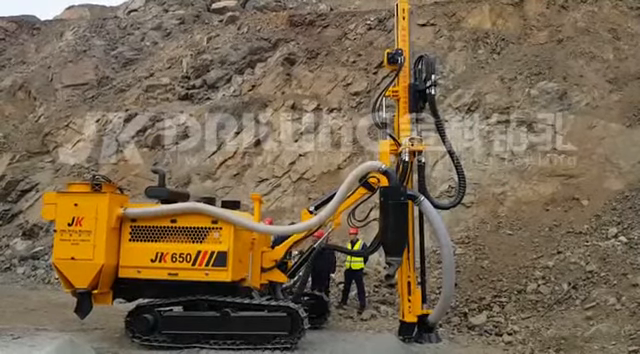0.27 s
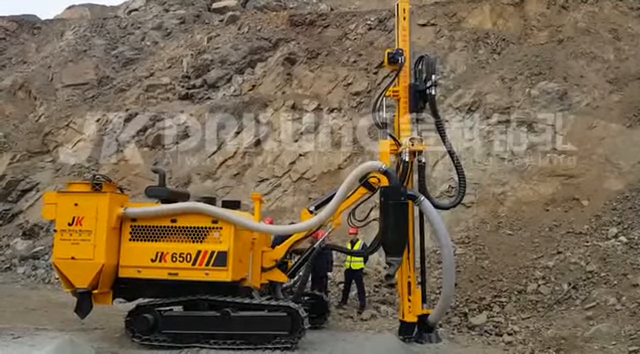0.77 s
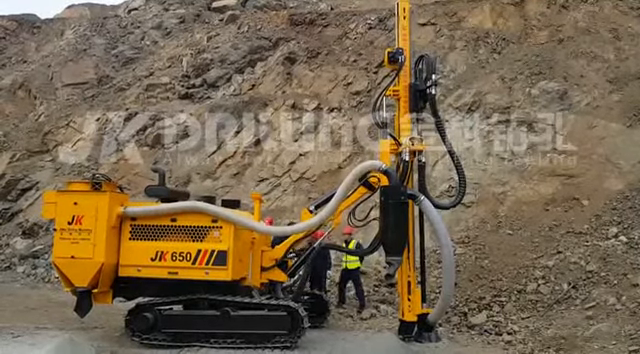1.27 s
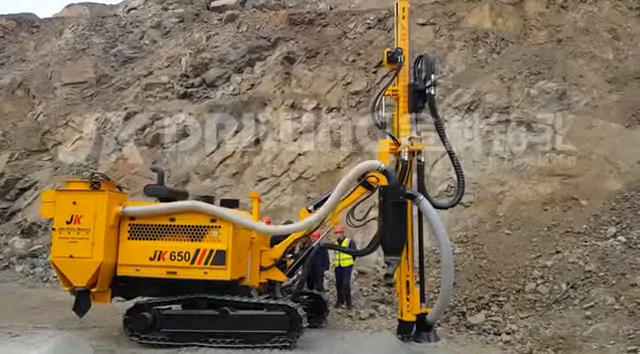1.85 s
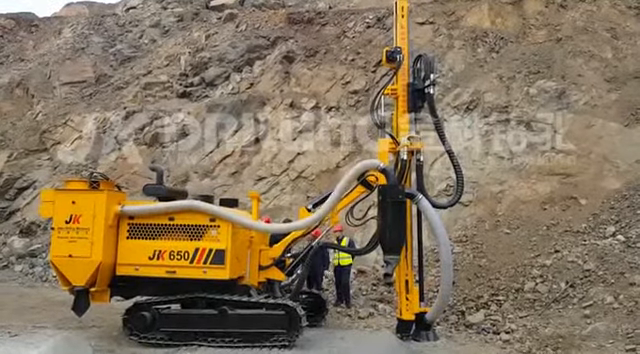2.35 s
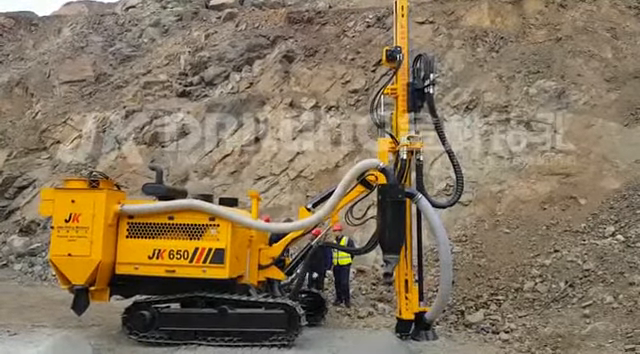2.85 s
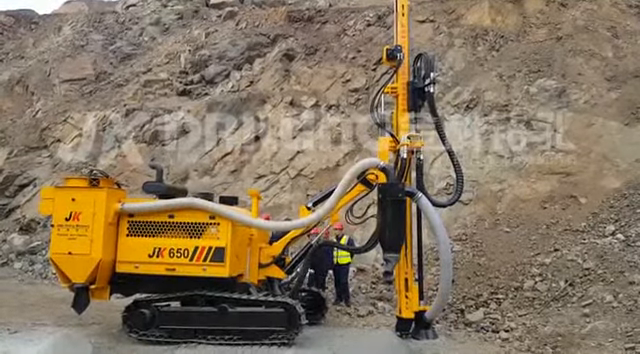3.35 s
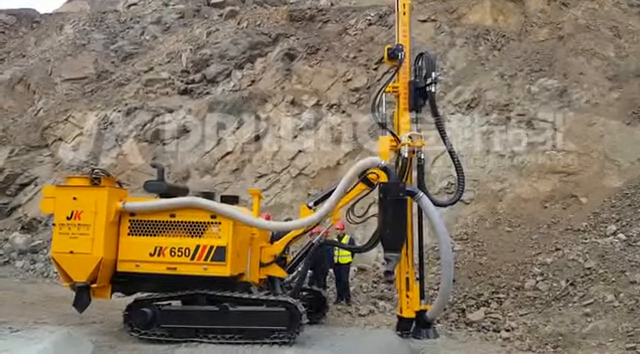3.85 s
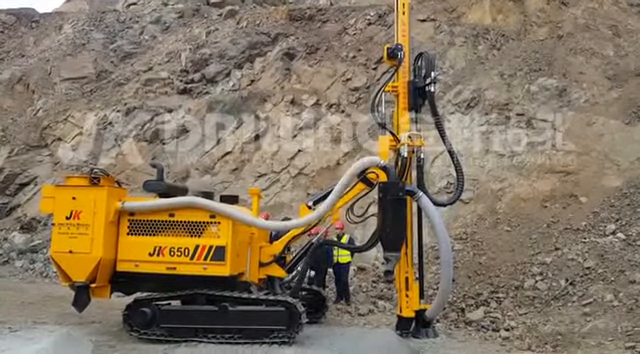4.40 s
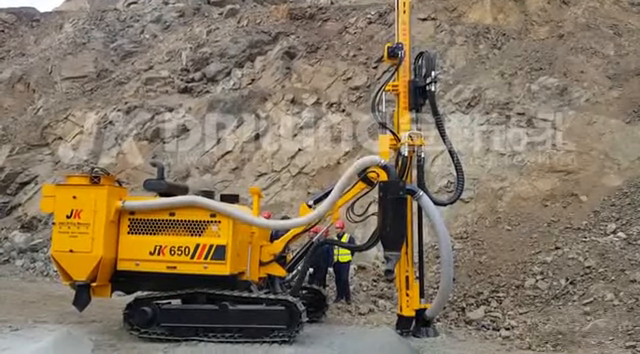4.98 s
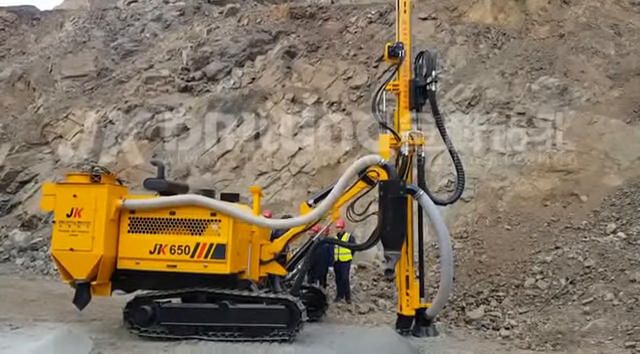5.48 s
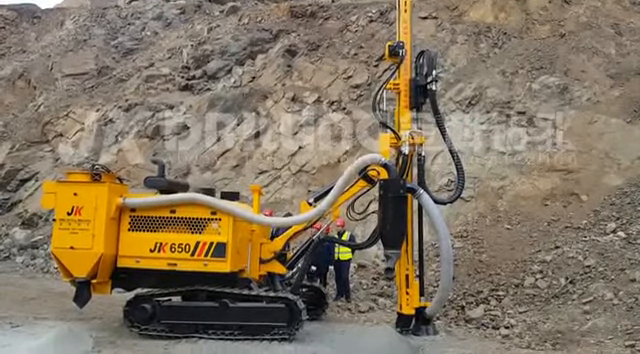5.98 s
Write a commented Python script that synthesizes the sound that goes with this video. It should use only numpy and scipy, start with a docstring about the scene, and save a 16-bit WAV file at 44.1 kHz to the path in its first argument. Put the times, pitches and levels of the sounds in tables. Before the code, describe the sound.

Piercing compressor whine and dense machine roar surround a fast steel hammer rattle, with brief metal squeals and a groan near the end.

```python
"""A crawler drill rig at a quarry face, heard some metres away through a two-port microphone.
From the start fans roar, pumps hum, the diesel drones on its engine orders and screw lobes whine in harmonics.
The air hammer clanks at 21 to 23 blows a second, exciting the modes of the steel rod; air hisses in puffs.
Noise jets spurt at 0.45 s and 1.3 s; the whine sags by 1.85 s and creeps back up until 5.8 s.
The level dips briefly at 4.4 s and 6.2 s; gliding sines squeal from 5.1 s and groan at 5.75 s; the hammer races last."""
import sys
import numpy as np
from scipy import signal
from scipy.fft import rfft, irfft
from scipy.io import wavfile

SR = 44100
rng = np.random.default_rng(int(sys.argv[2]) if len(sys.argv) > 2 else 0)


def generate_wav(sig):
    """Save sig (samples, or channels by samples) to the path in sys.argv[1] as 16-bit PCM at SR."""
    pcm = np.round(np.clip(np.atleast_2d(sig).T, -1, 1) * 32767).astype(np.int16)
    wavfile.write(sys.argv[1], SR, pcm)


N = 275184
TIME = np.arange(N) / SR
FREQS = np.maximum(np.arange(N // 2 + 1) * SR / N, 1)


def from_db(db):
    """Decibels to gain."""
    return 10 ** (np.asarray(db) / 20)


def rms_one(x):
    """Scale to rms 1."""
    return x / np.sqrt(np.mean(x ** 2) + 1e-20)


def in_time(rows):
    """The columns of a curve table at every sample."""
    s, *columns = np.transpose(rows)
    return [np.interp(TIME, s, column) for column in columns]


def in_frequency(rows):
    """The columns of a spectrum table at every frequency, joined along a logarithmic axis."""
    hz, *columns = np.transpose(rows)
    return [np.interp(np.log(FREQS), np.log(hz), column) for column in columns]


def drift(rate, slowest=0.92):
    """Random wander of spread 1, between about `slowest` and `rate` changes a second."""
    shape = FREQS ** 2 / (FREQS ** 2 + slowest ** 2) / (1 + (FREQS / rate) ** 2)
    return rms_one(irfft(rfft(rng.standard_normal(N)) * shape, N))


def turns(hz):
    """Cycles done so far at a changing rate."""
    return np.cumsum(hz * np.ones(N)) / SR


def tone(cycles):
    """A sine of rms 1 with a chance starting phase."""
    return np.sqrt(2) * np.sin(2 * np.pi * (cycles + rng.random()))


def resonance(x, hz, width):
    """Two-pole resonance with gain 1 on top."""
    r = np.exp(-np.pi * width / SR)
    feed = np.array([1, 0, -1]) * (1 - r * r) / 2
    feedback = [1, -2 * r * np.cos(2 * np.pi * hz / SR), r * r]
    return signal.lfilter(feed, feedback, x)


def dying(kicks, fall_s):
    """Every kick starts an exponential fall."""
    return signal.lfilter([1], [1, -np.exp(-1 / (fall_s * SR))], kicks + 1e-18)


def gate(start, length, edge_s):
    """Attack, hold and release of one event."""
    return np.clip(np.minimum(TIME - start, start + length - TIME) / edge_s, 0, 1)


def sides(amount):
    """Half of an amount to the left, minus half to the right."""
    return np.array([[.5], [-.5]]) * amount


# the sound field at the two microphone ports:
# (frequency [Hz], coherence [-1 to 1], lead of the left [rad], left-right [dB])
PORTS = [(30, .86, 0, 0), (55, .8, 0, 0), (85, .55, 0, 0), (120, .88, 0, 0), (165, .85, 0, 0),
         (200, .985, 0, 0), (280, .995, 0, -.1), (410, .975, 0, -.2), (470, .87, -.1, -.3),
         (720, .9, 0, -.6), (1180, .86, 0, -1.1), (1550, .1, 1.2, -2.7), (1800, .2, 1.2, .2),
         (2000, .68, 0, .9), (2200, .35, 2.6, .6), (2650, .5, 1.9, .6), (3000, .8, 2.9, 1),
         (3600, .4, 2.5, 2.8), (4700, .12, 0, 3.5), (5600, .05, 0, .5), (6300, .5, 0, .1),
         (7400, .3, 0, 1.5)]


def at_ports(pair):
    """Two unrelated signals become a sound field: alike in the bass, opposed near 3 kHz."""
    alike, lead, pan_db = in_frequency(PORTS)
    alike = np.clip(alike, -1, 1)
    mid, side = rfft(pair) * np.sqrt(np.array([1 + alike, 1 - alike]) / 2)
    ports = np.array([mid + side, mid - side])
    return irfft(ports * from_db(sides(pan_db)) * np.exp(1j * sides(lead)), N)


# the hammer's pace: (time [s], rate [blows/s])
HAMMER = [(0, 21.42), (0.9, 21.53), (1.6, 22.05), (2.2, 21.42), (5.8, 21.44), (6.24, 23.3)]
FIRST_STROKE = .12  # share of a stroke that passes before the first blow
STROKE_JITTER_S = 0.00119  # spread of the blows about their beat


def strokes(uneven_db):
    """One click for every stroke of the piston, scattered in timing and, by `uneven_db`, in strength."""
    pace, = in_time(HAMMER)
    at = np.flatnonzero(np.diff(np.floor(turns(pace) - FIRST_STROKE)))
    strength, late = np.clip(rng.standard_normal((len(at), 2)), -2, 2).T
    at = np.clip(at + (late * STROKE_JITTER_S * SR).astype(int), 0, N - 1)
    kicks = np.zeros(N)
    kicks[at] = from_db(uneven_db * strength)
    return kicks


# flicker of narrow noise bands: (frequency [Hz], spread before the rises are capped [dB])
BAND_FLICKER = [(900, 0), (1150, 3), (2100, 3), (2400, 6.5), (3400, 6.5), (3700, 2.2), (5000, 2.2),
                (7400, 3.2)]
FLICKER_PER_S = 13  # how fast they flicker


def band_flicker(noise):
    """Random flicker in level, drawn separately for each narrow noise band."""
    depth_db, = in_frequency(BAND_FLICKER)
    spectrum = rfft(noise)
    band = np.digitize(FREQS, np.geomspace(1100, 7800, 26))
    out = np.zeros((2, N))
    for k in range(band.max() + 1):
        flicker = np.minimum(drift(FLICKER_PER_S, slowest=4.4), 1)  # sinks further than it rises
        out += irfft(spectrum * (band == k), N) * from_db(depth_db[band == k].mean() * flicker)
    return rms_one(out)


# colour of the fan and air noise: (frequency [Hz], relative density [dB per Hz])
ROAR = [(25, -22.5), (55, -19), (120, -32.5), (300, -3.5), (380, -2), (480, -4.5), (570, -6), (1040, -2.5),
        (1170, -3.5), (1240, -9), (1340, -5), (1480, -8), (1750, -8.5), (2130, -5.5), (2320, -10.5),
        (2850, -18.5), (3170, -16), (3310, -20.5), (3420, -33.5), (3500, -19.5), (4150, -21.5), (4420, -27),
        (4800, -23.5), (5600, -27.5), (6300, -23.5), (7400, -30.5)]
# slow swell, in full on most of the whine and in part on the roar: (time [s], offset [dB])
LOUDNESS = [(0, -2), (0.7, -2.5), (1.3, -0.8), (1.85, -3.5), (2.4, -1.5), (3.3, -2.2), (3.85, -3.5),
            (5.1, -1.5), (5.35, -2), (5.88, 0.5), (6.24, -2.5)]
ROAR_FOLLOWS = 0.57  # share of that swell, in dB, taken by the roar and hiss
PUFF_SHARE = .05  # rms of the puffs against the steady hiss gain


def air(roar_db=-18.0, hiss_db=-18.5, churn_db=1.48):
    """Fans roar as coloured noise; above them the flushing air hisses, with puffs at the hammer's pace."""
    loud_db, = in_time(LOUDNESS)
    colour_db, = in_frequency(ROAR)
    noise = band_flicker(irfft(rfft(rng.standard_normal((2, N))) * from_db(colour_db), N))
    roar = irfft(rfft(noise) / (1 + (FREQS / 3370) ** 16), N)  # below about 3.4 kHz
    puffs = rms_one(dying(strokes(uneven_db=2.5), .01))
    flicker_db = .45 * drift(14, slowest=3)
    hiss = (noise - roar) * (1 + PUFF_SHARE * puffs) * from_db(hiss_db + flicker_db)
    churn = drift(15, slowest=5)
    return (roar * from_db(roar_db + churn_db * churn) + hiss) * from_db(ROAR_FOLLOWS * loud_db)


# spurts of flushing air: (start [s], length [s], held level [dB rms])
SPURTS = [(0.45, 0.054, -35), (1.305, 0.095, -32), (1.385, .21, -38)]
SPURT_EDGE_S = .03  # attack and release
SPURT_HZ, SPURT_WIDTH_HZ = 6050, 1500  # centre and width of the hiss


def spurts():
    """Air escapes in short, bright jets of resonant noise."""
    jet = rms_one(resonance(rng.standard_normal((2, N)), SPURT_HZ, SPURT_WIDTH_HZ))
    return jet * sum(from_db(db) * gate(s, length, SPURT_EDGE_S) for s, length, db in SPURTS)


# steady tones of the pumps and fans: (frequency [Hz], level before wavering [dB rms])
PUMPS = [(92.0, -33), (160, -38.5), (218.4, -29.5), (655.3, -40)]


def pumps(hunting=0.0029, waver_db=3.0):
    """Each pump and fan hums at its own nearly steady rate."""
    hum = np.zeros(N)
    for hz, db in PUMPS:
        cycles = turns(hz * (1 + hunting * drift(7.9)))
        hum += tone(cycles) * from_db(db + waver_db * drift(2.7))
    return hum


# engine orders; six cylinders fire at multiple 6:
# (multiple of the four-stroke cycle rate, level before unevenness and muffler [dB rms])
DIESEL = [(6, -37), (10, -39.5), (11, -38), (12, -38), (13, -40), (15, -43.5), (17, -42), (18, -40),
          (20, -39.5), (21, -41.5), (22, -43), (24, -43)]
CYCLE_HZ = 13.86
MUFFLER_HZ = 59  # the drone falls away below this


def diesel(hunting=0.00416, uneven_db=8.5):
    """Unequal cylinders fill in the orders around the firing rate."""
    cycles = turns(CYCLE_HZ * (1 + hunting * drift(0.84)))
    drone = np.zeros(N)
    for order, db in DIESEL:
        uneven = np.minimum(drift(59, slowest=1.8), np.sqrt(2))
        drone += tone(order * cycles) * from_db(db + uneven_db * uneven)
    muffler = signal.butter(4, MUFFLER_HZ, "high", fs=SR, output="sos")
    return signal.sosfilt(muffler, drone)


# harmonics of the whine: (harmonic number, level before swells and flutter [dB rms])
WHINE = [(1, -19.5), (2, -17.5), (3, -28), (4, -17), (5, -51.5), (6, -29), (7, -55.5), (8, -41.5)]
# how each harmonic, in the same order, reaches the ports: (left-right [dB], lead of the left [rad])
PATHS = [(-0.4, 0.15), (-2.2, 0.4), (-9, 1.9), (0, 2.36), (1.9, -2.1), (-1.7, -2.2), (3.4, -2.5),
         (13, -1.8)]
# compressor speed, sagging and creeping back: (time [s], lobe rate [Hz])
SPEED = [(0, 536.6), (1.4, 537.5), (1.85, 535.6), (3.3, 537.1), (5.8, 539.0), (6.24, 538.5)]
# the fourth harmonic swells a little, and fades at the left port:
# (time [s], offset [dB], extra gain of the left [dB])
FOURTH = [(0, 1, -1.3), (0.7, 1.2, -2.2), (1, -0.5, -2.6), (1.7, -0.5, -2.4), (2.2, 1.3, -2.2),
          (3.0, 1.2, -2.6), (3.6, 0.3, -3.0), (4.4, 1, -5.5), (5.3, 1.2, -8.1), (5.8, 1.8, -7),
          (6.24, -0.5, -5.9)]
# the sixth harmonic comes and goes: (time [s], offset on top of LOUDNESS [dB])
SIXTH = [(0, -1), (0.63, -3), (0.74, -9.5), (1.35, -9), (1.52, -4), (1.8, -4.5), (1.92, -8), (2.25, -4),
         (2.45, -3), (2.8, -2.5), (3.25, -4.5), (3.8, -0.5), (4.84, -0.5), (4.95, -5.5), (5.98, -6),
         (6.1, 0), (6.24, -2)]
# the eighth harmonic comes and goes: (time [s], offset on top of LOUDNESS [dB])
EIGHTH = [(0, 1), (1.3, -3.5), (1.75, 1.5), (1.95, -4), (2.2, -3), (2.8, 1), (3.1, 0), (3.3, -2.5),
          (4.0, 0), (4.9, -1), (5.05, -1.5), (5.35, -4), (5.5, -5.5), (5.65, -3), (5.85, -6), (6.05, -1),
          (6.24, -7)]
SCATTER = .045  # share of the first harmonic that arrives by stirred air


def compressor(wobble_hz=0.23, flutter_db=1.34, flutter_per_s=14):
    """Screw lobes chop the air into a harmonic whine; stirred air scatters the high harmonics most."""
    (hz,), (loud_db,) = in_time(SPEED), in_time(LOUDNESS)
    fourth_db, fourth_left_db = in_time(FOURTH)
    swell_db = {4: fourth_db, 6: loud_db + in_time(SIXTH)[0], 8: loud_db + in_time(EIGHTH)[0]}
    cycles = turns(hz + wobble_hz * drift(5.5))
    out = np.zeros((2, N))
    for (k, db), (pan_db, lead) in zip(WHINE, PATHS):
        stir = np.array([drift(flutter_per_s, slowest=3) for _ in range(5)])
        scattered = stir[:2] + 1j * stir[2:4]
        path = np.exp(1j * sides(lead)) + SCATTER * np.cbrt(k) * scattered
        carrier = np.exp(2j * np.pi * (k * cycles + rng.random()))
        wave = np.sqrt(2) * np.real(path * carrier)
        if k == 4:
            wave[0] *= from_db(fourth_left_db)
        flutter = flutter_db * np.cbrt(k) * stir[-1]
        out += wave * from_db(db + flutter + sides(pan_db) + swell_db.get(k, loud_db))
    return out


# the rod squeals, then groans, in its guide:
# (start [s], length [s], first pitch [Hz], last pitch [Hz], held level [dB rms])
SQUEALS = [(5.095, 0.072, 656, 640, -24.5), (5.16, 0.13, 668, 642, -26), (5.278, 0.056, 644, 596, -26),
           (5.748, .135, 372, 364, -26)]
SQUEAL_EDGE_S = 0.012  # attack and release of a slip


def squeal(waver=0.003):
    """Steel rubbing in the guide sings in short slips, each falling in pitch."""
    out = np.zeros(N)
    wobble = 1 + waver * drift(60, slowest=10)
    for s, length, first_hz, last_hz, db in SQUEALS:
        pitch = np.interp(TIME, [s, s + length], [first_hz, last_hz]) * wobble
        out += tone(turns(pitch)) * from_db(db) * gate(s, length, SQUEAL_EDGE_S)
    return out


# the bit meets hard rock: (time [s], strength above a usual blow [dB])
HARD_BLOWS = [(0.194, 5), (0.289, 7), (0.427, 7), (0.5646, 10), (0.617, 3.5), (0.9824, 4.5), (1.0715, 7),
              (1.348, 10.5), (1.395, 4), (1.6753, 5), (1.852, 4.5), (1.945, 4), (2.223, 3), (2.27, 4.5),
              (2.3645, 5.5), (2.4577, 2.5), (2.736, 4.5), (2.884, 2), (2.9736, 4.5), (3.2045, 2),
              (3.668, 5.5), (4.228, 0), (4.7475, 3.5), (4.8396, 5), (4.9289, 2.5), (5.115, 0.5),
              (5.2115, 4.5), (5.3556, 5.5), (5.443, 3), (5.5337, 6.5), (5.582, 3), (5.718, 3.5),
              (5.991, 5.5)]


def blows(bite):
    """The piston's strokes, as firm as the bite; hard rock gives blows of its own strength."""
    kicks = strokes(uneven_db=0.0) * bite / bite.mean()
    for s, db in HARD_BLOWS:
        kicks[np.abs(TIME - s) < .02] = 0  # the hard blow replaces the usual one
        kicks[round(s * SR)] = from_db(db)
    return kicks


CLANK_HZ, CLANK_WIDTH_HZ = 1973, 280
CLANK_DB = -17.8  # peak on a usual blow


def clank(kicks):
    """The first stress wave of every blow leaves the rod as one short, sharp clank."""
    wave = resonance(kicks, CLANK_HZ, CLANK_WIDTH_HZ)
    wave = resonance(wave, CLANK_HZ, CLANK_WIDTH_HZ)
    return wave / np.abs(wave).max() * kicks.max() * from_db(CLANK_DB)


# ringing modes of drill rod and mast: (frequency [Hz], width [Hz], relative drive [dB])
ROD = [(923, 100, -11.5), (1348, 80, -9.5), (1816, 84, -10), (1874, 62, -6), (2000, 76, -0.5),
       (2091, 60, -0.5), (2210, 39, -0.5), (2424, 38, -3), (2440, 67, -9.5), (2618, 18, 4.5),
       (2726, 37, 1.5), (2800, 110, -5), (2844, 48, -7), (2960, 45, -6), (3630, 210, -21), (3830, 200, -20)]
# how firmly the bit bites: (time [s], firmness before bite_follows scales it [dB])
BITE = [(0, 3), (1.0, 9), (1.6, -1), (2.3, 5), (2.95, 9), (3.3, 3.5), (4.55, 2), (4.9, 6.5), (5.6, 3.5),
        (6.24, -2)]
RING_FOLLOWS = .45  # share of a blow's extra dB that reaches the ringing modes
REBOUND_S, REBOUND_UNEVEN_DB = 0.035, -0.5  # delay of the piston's rebound; spread of its strength
# the rebound and the steady grinding in the low and high modes, against a blow
REBOUND_DB, GRIND_DB, HIGH_GRIND_DB = -11, -37, -36
HIGH_MODES_HZ, HIGH_MODE_SWING_DB = 2300, 7  # modes above this sink by up to twice the swing
MODE_DRIFT_PER_S = 13  # how fast the mode levels drift


def drill_rod(level_db=-21.0, mode_spread_db=1.5, chatter_share=0.03, chatter_s=0.0057, bite_follows=0.33):
    """Blows clank and ring the steel, joints chatter, the piston rebounds and the bit grinds on in between.
    Random drift makes the level of each high mode sink and return."""
    bite = from_db(bite_follows * in_time(BITE)[0])
    hits = blows(bite)
    rebounds = np.roll(strokes(REBOUND_UNEVEN_DB), round(REBOUND_S * SR))
    kicks = hits ** RING_FOLLOWS * bite.mean() + rebounds * bite * from_db(REBOUND_DB)
    at = np.flatnonzero(kicks)
    friction = rng.standard_normal((2, N))
    chatter = chatter_share * dying(kicks, chatter_s)
    steel = np.zeros((2, N))
    for hz, width, db in ROD:
        grind_db, swing_db = GRIND_DB, 0.0
        if hz > HIGH_MODES_HZ:
            grind_db, swing_db = HIGH_GRIND_DB, HIGH_MODE_SWING_DB
        # each blow feeds each mode in its own way
        polarity, strength = rng.standard_normal((len(at), 2, 2)).T
        drive = (chatter + from_db(grind_db) * bite) * friction
        drive[:, at] += kicks[at] * np.sign(polarity) * from_db(mode_spread_db * strength)
        level_drift = np.tanh(drift(MODE_DRIFT_PER_S, slowest=4.7)) - 1.0
        drive *= from_db(db + swing_db * level_drift)
        # the blow comes up from down the hole, so each ring takes a few ms to build
        steel += resonance(resonance(drive, hz, width), hz, width)
    return clank(hits + 1e-18) + at_ports(rms_one(steel) * from_db(level_db))


def scene():
    """The whole rig as it reaches the two ports."""
    background = at_ports(air() + spurts())
    engine = pumps() + diesel() + compressor()
    return background + engine + squeal() + drill_rod()


# the level dips briefly: (time [s], depth [dB], Gaussian width [s])
DIPS = [(4.389, 3.5, 0.0066), (6.192, 9, 0.0037)]
CUTOFF_HZ = 7620


def record(dry):
    """Brief dips in level, rounded peaks and a steep cut of the top."""
    dip_db = sum(depth * np.exp(-.5 * ((TIME - s) / width) ** 2) for s, depth, width in DIPS)
    x = dry * from_db(-dip_db)
    rounded = x / (1 + (x / .9) ** 8) ** (1 / 8)  # never beyond 0.9
    steep = signal.ellip(12, .1, 80, CUTOFF_HZ, fs=SR, output="sos")
    return signal.sosfilt(steep, rounded)


dry = scene()
out = record(dry)
generate_wav(out)
```